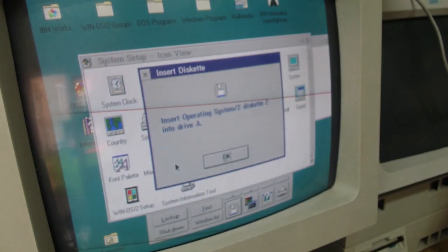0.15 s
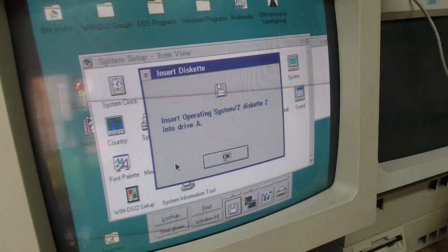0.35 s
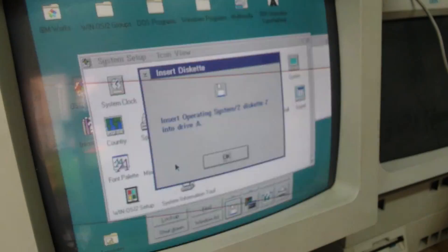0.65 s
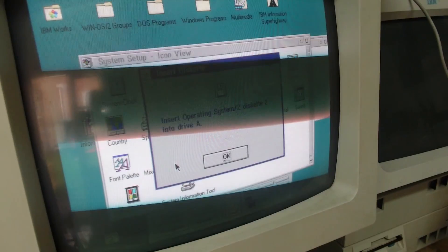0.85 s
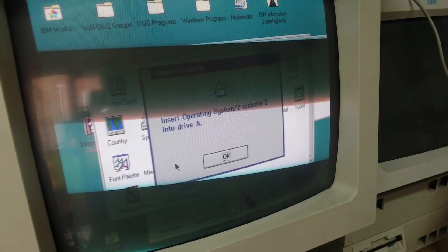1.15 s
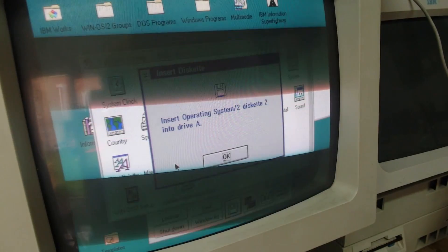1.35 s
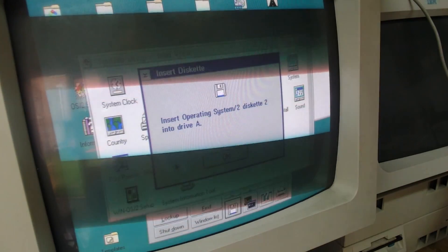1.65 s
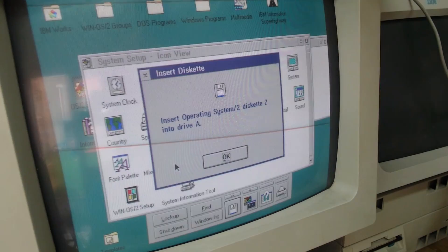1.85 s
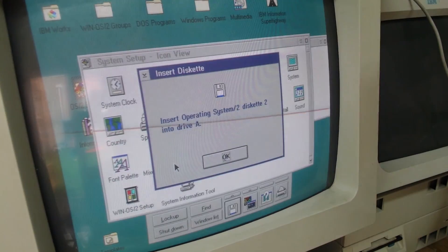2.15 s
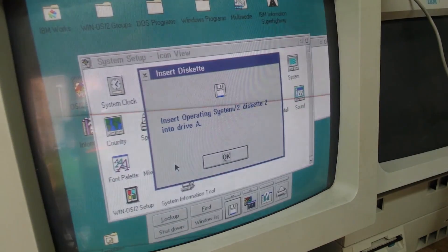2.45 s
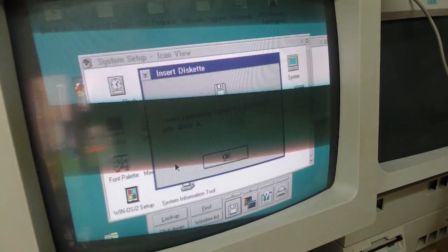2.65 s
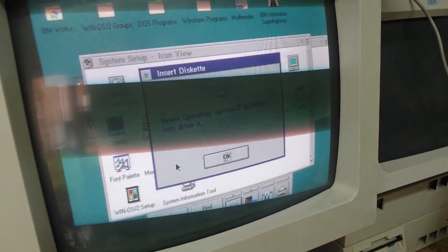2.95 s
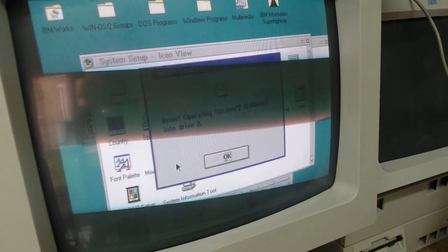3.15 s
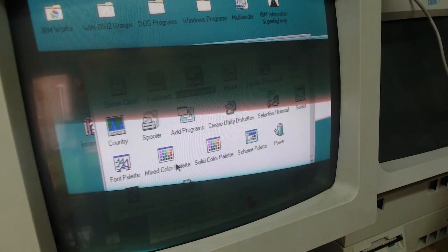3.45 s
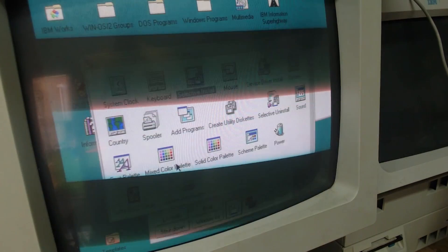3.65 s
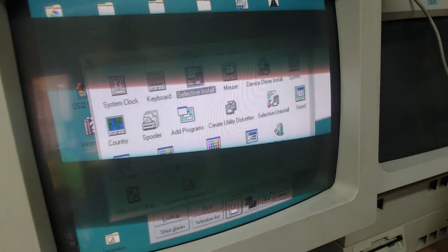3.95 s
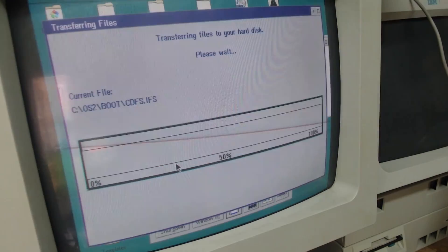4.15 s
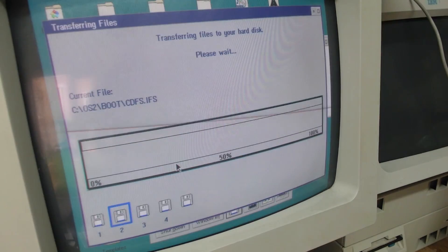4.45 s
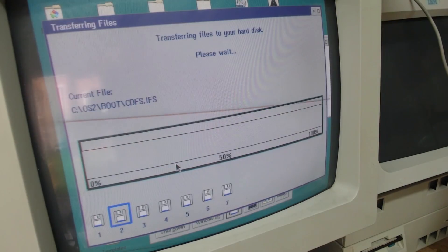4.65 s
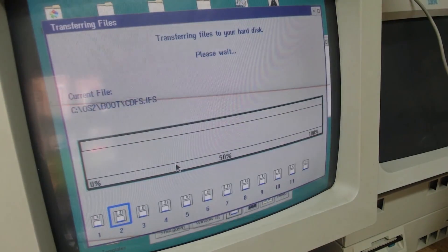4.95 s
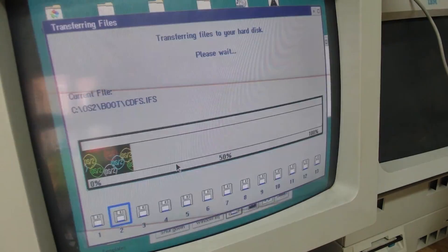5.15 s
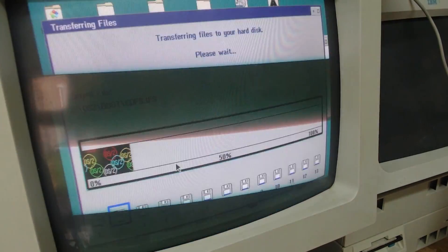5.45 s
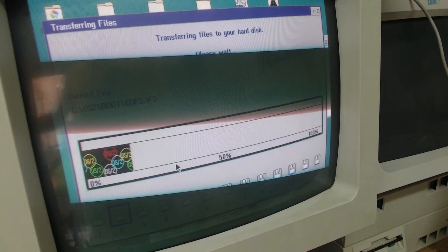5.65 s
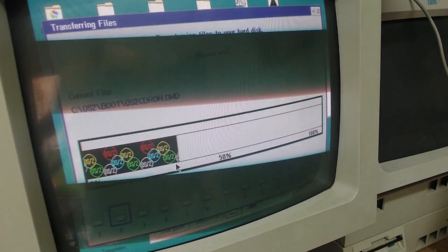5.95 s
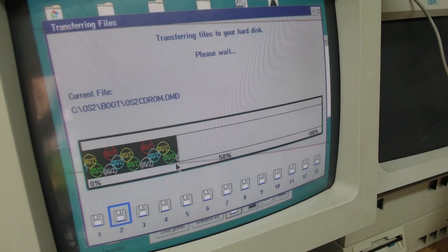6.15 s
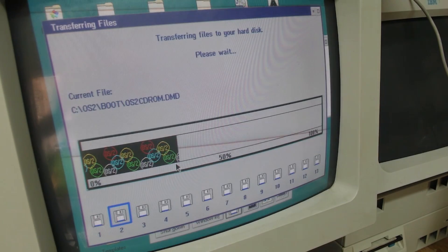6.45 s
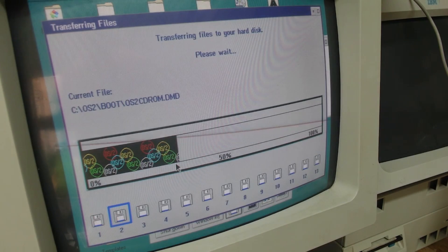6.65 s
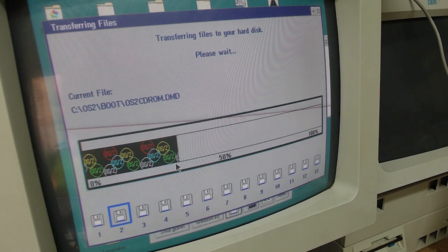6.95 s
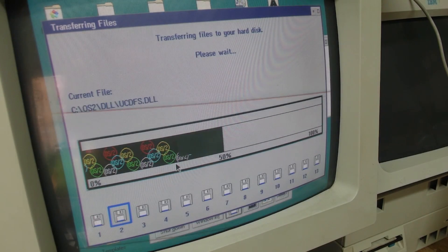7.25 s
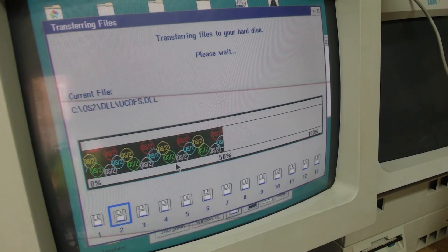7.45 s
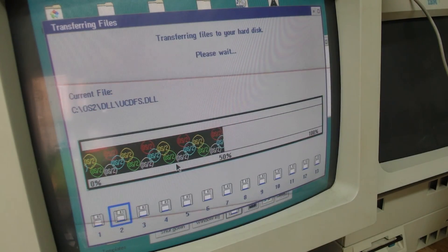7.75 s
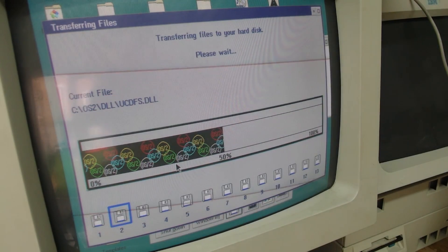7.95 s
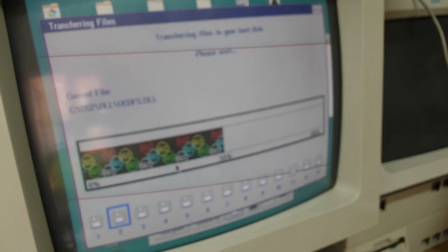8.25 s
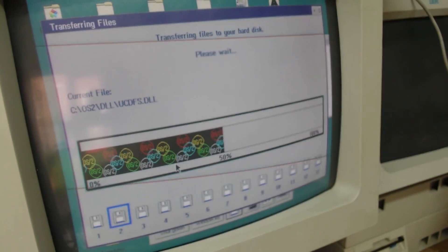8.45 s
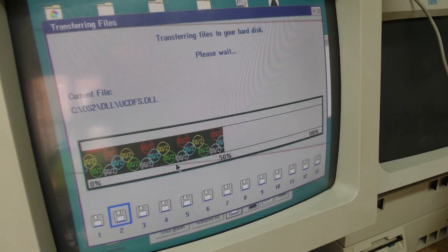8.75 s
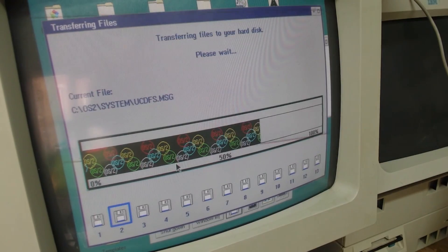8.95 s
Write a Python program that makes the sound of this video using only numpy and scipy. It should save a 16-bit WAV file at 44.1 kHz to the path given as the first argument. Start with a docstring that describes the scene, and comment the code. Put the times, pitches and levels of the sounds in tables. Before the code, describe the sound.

In a small room, a close single microphone hears a hard plastic snap, then light ticks and scrapes as a diskette is handled. A cluster of sharp clacks follows near two seconds as it seats. The drive's thin, high whine swells and beats, short stepper buzzes come around four seconds, then the plastic is shuffled and clicked again over soft fan hiss.

```python
"""A small room with a desktop computer: a plastic diskette is handled, pushed into a drive and shuffled about.
Strokes are gritty noise and knocks are short noise bursts, both ringing plastic modes; sung notes are added.
The spindle motor whines on sines near 3 kHz that swell and beat; the head stepper buzzes on two sines.
Fans hiss as shaped noise over steady hums. One microphone feeds both channels."""
import sys
import numpy as np
from scipy import signal
from scipy.io import wavfile

SR = 44100
rng = np.random.default_rng(int(sys.argv[2]) if len(sys.argv) > 2 else 0)


def to_wav(sig):
    """Store sig (one row per channel, or 1-D mono) as 16-bit WAV at the path in sys.argv[1].

    Samples outside -1..1 are clipped; the rate is SR.
    """
    pcm = np.clip(np.atleast_2d(sig), -1, 1) * 32767
    pcm = np.round(pcm).astype(np.int16)
    wavfile.write(sys.argv[1], SR, pcm.T)  # frames by channels


N = 401751

# air noise of the fans, relative density: hz, level_db (per Hz)
FAN_SPECTRUM = [(25, 13.5), (55, -17), (90, -23), (190, -8.5), (450, -6.5), (700, -10.5), (1250, -10),
                (1500, -20.5), (2100, -16), (2900, -17.5), (4000, -18), (7000, -22), (10000, -28.5),
                (16000, -35)]
FANS_DB = -60   # rms of all bands together
# steady hums and whistles of the computer: pitch_hz, level_db (rms before wavering)
HUMS = [(73, -80.5), (1200, -81), (1245, -74), (1814, -74.5), (9000, -76), (10800, -84), (11700, -86.5)]

# weaker motor tones, mostly on every seventh multiple of the turn rate and its neighbours: multiple
MOTOR_MULTIPLES = (35, 42, 47, 48, 49, 55, 57, 69, 70, 77, 83, 92, 98, 99, 113, 120, 147, 154)
# their levels in the same order: level_db (rms before wavering)
MOTOR_MULTIPLES_DB = (-75, -77, -81, -75, -77, -75.5, -72.5, -70, -71.5, -72.5, -74, -77.5, -74.5, -86, -77,
                      -76.5, -77.5, -78)
TURN_HZ = 46.215
POLES, FAINT_FROM, FAINT_TO = 7, 11, 36   # faint tones flank these multiples of the pole rate, the last excluded
FAINT_DB, FAINT_DB_PER_OCTAVE = -84.5, -6   # lowest faint tone before wavering, slope above it

# strongest motor tones, the first three evenly spaced: pitch_hz
WHINE_HZ = (2866.3, 2911.45, 2956.6, 3281.0, 7072.0)
# their uneven swelling and fading: time_s, then level_db (rms before flutter) of each tone
WHINE_CURVE = [(0, -63, -78, -63, -65, -73), (0.42, -54, -60, -57, -48, -59),
               (0.75, -78, -66, -68, -62, -82), (1.0, -82, -76, -80, -58, -79),
               (1.42, -70, -60, -57.5, -63, -75), (1.7, -78, -62.5, -71, -62, -68),
               (2.05, -64, -65, -71, -58, -61), (2.14, -53.5, -62, -66, -60, -70),
               (2.3, -69, -84, -58, -61, -68), (2.75, -70, -56, -58.5, -60, -75),
               (3.12, -67, -56, -52.5, -62, -78), (3.25, -51, -74, -63, -60, -80),
               (3.5, -57, -77, -56, -52.5, -78), (3.76, -71, -66, -57.5, -63, -63),
               (4.04, -56, -55.5, -52, -61, -74), (4.12, -51, -56, -46.5, -64, -72),
               (4.4, -59, -63, -59.5, -63, -67), (4.68, -87, -68, -57.5, -61, -76),
               (4.9, -58, -57.5, -60, -74, -66), (5.1, -59, -52, -57, -77, -69),
               (5.26, -49, -49.5, -52, -61, -65), (5.42, -58, -65, -58, -69, -75),
               (5.62, -59, -71, -71, -71, -51), (6.12, -43, -51, -62, -53, -66),
               (6.4, -43, -54.5, -51.5, -61, -74), (6.75, -62, -65, -72, -68, -91),
               (7.05, -54, -80, -80, -76, -74), (7.25, -48, -54, -69, -62, -94),
               (7.5, -39, -59, -52, -57, -66), (7.78, -52, -61, -72, -60, -67),
               (8.03, -69, -78, -68, -63, -68), (8.27, -57.5, -78, -69, -69, -63),
               (8.55, -48.5, -68, -55.5, -65, -72.5), (8.82, -44, -54, -56, -60, -59),
               (9.1, -64, -54.5, -70, -67, -88)]
THROB_S = 5.2535   # moment at which the strong tones are nearly in step
# fluttering swells of noise below the whine: centre_s, half_length_s, level_db (at the centre)
SWELLS = [(1.43, 0.15, -58.5), (2.14, 0.038, -53.5)]
SWELL_HZ, SWELL_WIDTH_HZ = 2630, 140

# bursts of the head stepper: start_s, end_s, step_level_db, octave_level_db (rms before unevenness)
SEEKS = [(3.562, 3.594, -72, -50), (3.605, 3.682, -56.5, -56.5), (3.968, 4.008, -76, -55),
         (4.023, 4.085, -54.5, -62), (4.19, 4.282, -59.5, -65), (4.275, 4.322, -74, -58)]
STEP_HZ = 323

# modes of diskette and drive, each table: pitch_hz, width_hz (nominal), level_db (relative)
# hollow body, low and boxy
HOLLOW_MODES = [(103, 84, -22.5), (190, 193, -6), (252.5, 137, 1), (421, 74, -1.5), (609, 138, -5.5)]
# plastic shell, middle
SHELL_MODES = [(759, 174, 1.5), (947, 317, -1.5), (1252, 380, -4), (1525, 203, -0.5), (1736, 270, 0.5),
               (2236, 280, -0.5), (2550, 166, 1.5), (2883, 460, -4), (4214, 810, -8.5)]
# hard edges, bright
EDGE_MODES = [(3920, 810, 0), (4650, 365, 2.5), (5230, 1600, -0.5), (7230, 900, -4.5), (8170, 1380, -4),
              (11270, 3900, -11), (13240, 4700, -14), (14800, 600, -13)]
PATCHY_DB, EDGE_PATCHY_DB = 2.5, 2.2   # spread by which a shifting grip moves each mode

# knocks and snaps: start_s, level_db (relative peak), hollow_db and edge_db (above shell), pitch_hz (struck part)
KNOCKS = [(0.085, -44, -10, -10, 1220), (0.123, -7.5, -34, -3.5, 2497), (0.221, -32, -28, 2.5, 1090),
          (0.263, -20, -3, -13, 2490), (0.349, -25.5, -30, 0, 1760), (0.459, -29.5, -13, -4, 1460),
          (0.56, -28, -25, 5, 1275), (0.647, -32.5, -31, -1, 2274), (0.886, -30.5, -24, -1, 870),
          (0.899, -22, -30, -26, 1216), (1.009, -37, -22, -18, 1010), (1.034, -31.5, -21, -6, 803),
          (1.05, -34.5, -17, 2.5, 1180), (1.09, -19.5, -25, 8.5, 1225), (1.095, -15.5, -28, -2, 1395),
          (1.1, -40.5, 7.5, -25, 113), (1.198, -45.5, -33, 11, 1090), (1.214, -38, -22, -24, 1250),
          (1.816, -11.5, -6.5, 2, 1510), (1.818, -17, 6, -21, 414), (1.871, -9, -21, -2.5, 1360),
          (1.912, -17.5, -25, -1, 1240), (1.921, -21.5, -25, 9, 1510), (3.251, -31.5, -10, -6.5, 858),
          (3.308, -31, -5, 3, 1880), (3.324, -25, -3.5, -12, 1715), (3.412, -31, -21, 7, 970),
          (3.455, -25.5, -33, -3, 2980), (3.466, -24.5, -40, 4, 2480), (3.47, -26, -27, -15.5, 2460),
          (3.515, -38.5, -28, 9.5, 966), (3.546, -29, -30, 3.5, 2660), (3.593, -32, -23, 2, 1720),
          (3.712, -35.5, -33, 7.5, 1570), (3.799, -35.5, -25, 11.5, 1051), (3.883, -23, -37, -6, 2406),
          (3.917, -34.5, -33, 3.5, 1046), (4.18, -38, -8, 10, 1730), (4.219, -37.5, -8, 1, 2900),
          (4.321, -41, -12, 5.5, 1084), (4.467, -29.5, -18, -12, 2490), (4.501, -33.5, -29, -25, 1840),
          (4.506, -34.5, -1.5, -25, 617), (4.543, -37, -22, -25, 934), (4.809, -38, -28, 7.5, 1650),
          (5.047, -49.5, 8.5, -25, 250), (5.167, -33, -28, -15.5, 1290), (5.363, -40, -25, -20, 1830),
          (5.489, -33, -1, -9, 1750), (5.512, -29, -23, 6, 2250), (5.7, -35, -15, 8, 1050),
          (5.706, -14, -10, -10, 2790), (5.727, -13.5, -31, -8.5, 3060), (5.762, -20, -0.5, -6, 934),
          (5.812, -36.5, -15, 14.5, 1550), (5.867, -24.5, -27, -8, 3620), (5.898, -24.5, -9, -4, 737),
          (5.967, -28.5, -21, 15, 2010), (5.985, -21, -21, -11, 947), (6.056, -23, -6, -11, 890),
          (6.262, -33, -18, -22.5, 2046), (6.331, -32.5, 0.5, -19, 1070), (6.525, -34.5, -13, -22, 810),
          (6.896, -37.5, -39, 12.5, 2130), (7.176, -26.5, -7, 3, 729), (7.532, -37.5, -13, -6, 1280),
          (7.696, -36, -7, -4, 1570), (7.846, -42.5, -1, -25, 466), (7.906, -26.5, -42, -11, 1500),
          (8.1, -39, -23, -20, 1490), (8.269, -40, 5.5, -7, 181), (8.753, -44.5, -22, 2, 2010),
          (8.834, -39, -34, -6, 2420)]
CRACK_T60_S = 0.013   # time for the crack to fall 60 dB
SOFT_BELOW_DB = -15   # knocks with less edge than this land softly
LOW_NOTE_HZ = 650   # knocks below this note strike the hollow body
# the stronger the edge above this level, the brighter the snap: dB per octave of tilt for each dB of edge
SNAP_FROM_DB, SNAP_DB_PER_OCTAVE = 6.5, 1.06

# sliding strokes of plastic parts: start_s, rise_s, fade_s, level_db (shell peak, relative),
# loss_db (over the fade, negative grows), hollow_db and edge_db (above shell), pitch_hz (favoured shell)
RUBS = [(0.116, 0.004, 0.17, -32.5, 37, 0.5, -4, 2040), (0.225, 0.033, 0.14, -37, 2, -7.5, -1, 1620),
        (0.409, 0.045, 0.032, -36, 6.5, -16.5, 2, 1460), (0.48, 0.012, 0.067, -52.5, -2, -14, 12, 1840),
        (0.565, 0.018, 0.022, -39, 4.5, -6.5, -9, 1170), (0.646, 0.002, 0.019, -46, 6.5, -22, -12, 2200),
        (0.874, 0.022, 0.035, -39.5, 5.5, -2.5, -10.5, 1110), (1.03, 0.024, .03, -46.5, 9, -10, -12, 1210),
        (1.079, 0.01, 0.17, -32, 32, -5, -2.5, 1370), (1.19, 0.0081, 0.023, -51.5, -1.5, -20, -23, 1105),
        (1.811, 0.0025, 0.087, -34, -0.5, 3, -10, 1450), (1.925, 0.0091, 0.046, -33, 13.5, -17, -20, 1560),
        (2.36, 0.062, 0.04, -57, 23, 1.5, -18, 1570), (2.8, 0.083, 0.15, -30, 18, -33, -2.5, 2650),
        (3.183, 0.0069, .035, -47.5, 3, -22, -18, 4263), (3.235, 0.013, 0.32, -48, -5, -17, -13, 1164),
        (3.705, 0.0043, 0.13, -50.5, 3.5, -10, -10, 1190), (3.87, 0.027, 0.15, -50, 0, -17, 2, 1020),
        (4.1, 0.047, 0.057, -44.5, 5, -9, -14, 900), (4.25, 0.016, 0.13, -56, 3, -4.5, -7, 1220),
        (4.466, 0.0046, 0.046, -42, 8, -32, -19, 1880), (4.52, 0.0088, 0.05, -51, 12, -25, -17, 1500),
        (4.585, 0.013, 0.062, -56.5, -5, -9, -13, 1710), (4.72, 0.025, 0.094, -56.5, 0, -19, -11, 1200),
        (4.93, 0.02, 0.037, -60.5, 2, -9, -15, 1205), (5.05, 0.032, 0.098, -51.5, 10, -13, -9, 1200),
        (5.355, 0.0077, 0.13, -58, 10, -9, -18, 1750), (5.315, 0.01, 0.035, -58, 1, -10, -20, 1205),
        (5.482, 0.024, 0.17, -37, 9, -7.5, -2.5, 1470), (5.695, 0.038, 0.077, -30.5, 6, -6, -2, 1500),
        (5.778, 0.01, 0.39, -36.5, 1, -7, 0, 1004), (6.02, 0.057, 0.074, -30.5, 8.5, -6.5, -2.5, 1240),
        (6.17, 0.0083, 0.049, -38.5, 13, -24, -1, 1315), (6.257, 0.013, 0.19, -40, 24.5, -15.5, -0.5, 1502),
        (6.53, 0.011, 0.096, -57, 8, -20, -13, 950), (6.72, 0.035, 0.087, -51.5, 12, -17, -6, 1150),
        (6.893, 0.013, 0.053, -36.5, 10, -33, 2.5, 2110), (6.94, 0.052, 0.12, -39.5, 11, -22, -18, 1230),
        (7.075, 0.023, 0.027, -57, 6.5, -20, 14, 2190), (7.144, 0.014, 0.047, -41.5, -1, -20, -4, 1150),
        (7.28, 0.031, 0.081, -44.5, 22, -39, -22, 1670), (7.6, 0.013, 0.075, -52, 3, -11, -8, 1010),
        (7.67, 0.032, 0.055, -40.5, 13, -33, -2.5, 1580), (7.72, 0.04, 0.039, -46.5, -0.5, -18, -13, 4400),
        (7.894, 0.016, 0.096, -32.5, 33, -28, 5, 2020), (7.96, 0.0083, 0.25, -54, 10, -28, -1, 4570),
        (8.1, 0.012, 0.044, -48.5, 2.5, -12, -8, 880), (8.19, 0.042, 0.052, -62, -1, -25, -5, 4600)]
RUB_START_DB, RUB_LIFT_S, RUB_LIFT_DB = -13, 0.028, -8   # starts below its peak, lifts off quickly
SLOW_START_DB_PER_S = 80   # a slow rise starts softer still
LIGHT_FROM_DB, LIGHT_SPAN_DB = -37, 11   # strokes below this level grow light over this span
EDGE_SWING = 0.3   # the edge rises and falls by this share more than the lowest shell mode
CHATTER_PER_S, CHATTER_S, CHATTER_DB = 70, 0.0021, 0   # loose parts tick: rate, decay time, largest tick
SPOT_DB, LIGHT_SPOT_DB = -18, 13.5   # song of the rubbed spot relative to stroke level, extra when light
SPOT_SHARPNESS = 8.0   # Hz of pitch per Hz of width

CUTOFF_HZ = 16400   # upper limit of the sound; nothing is heard above it


def from_db(db):
    """Decibels to gain."""
    return 10 ** (np.asarray(db) / 20)


def rms_one(x):
    """Scale to unit rms."""
    return x / np.sqrt(np.mean(x ** 2) + 1e-20)


def in_time(rows):
    """Draw the columns of a breakpoint curve, sample by sample."""
    s, *columns = np.transpose(rows)
    return np.array([np.interp(np.arange(N) / SR, s, c) for c in columns])


def drift(rate_hz):
    """Slow random wander of spread 1: noise through two equal poles, at one point per 40 samples."""
    r = np.exp(-2 * np.pi * rate_hz * 40 / SR)
    noise = rng.standard_normal(N // 40 + 2002)
    slow = signal.lfilter([1], [1, -2 * r, r * r], noise)[2000:]   # skip the settling
    return np.interp(np.arange(N) / 40, np.arange(len(slow)), rms_one(slow))


def resonance(x, hz, width_hz):
    """Two-pole resonance, gain 1 on top."""
    r = np.exp(-np.pi * width_hz / SR)
    feedback = [1, -2 * r * np.cos(2 * np.pi * hz / SR), r * r]
    return signal.lfilter((1 - r * r) / 2 * np.array([1, 0, -1]), feedback, x)


def steep_resonance(x, hz, width_hz):
    """The same resonance twice in a row, for steeper flanks."""
    return resonance(resonance(x, hz, width_hz), hz, width_hz)


def fans():
    """Steady air noise, built from half-octave bands of white noise."""
    out, white = np.zeros(N), rng.standard_normal((2, N))
    edges = 24 * 2 ** np.arange(0, 9.9, .5)
    hz, db = np.transpose(FAN_SPECTRUM)
    for k, (low, high) in enumerate(zip(edges, edges[1:])):
        band_filter = signal.butter(2, [low, high], "band", fs=SR, output="sos")
        band = signal.sosfilt(band_filter, white[k % 2])   # neighbours use separate noise
        out += from_db(np.interp(np.log(low * high) / 2, np.log(hz), db)) * band
    return from_db(FANS_DB) * rms_one(out)


def weak_tones(tones, waver_db, flutter_db=1.0):
    """Sines of fixed pitch whose levels waver slowly and flutter faster."""
    t, out = np.arange(N) / SR, np.zeros(N)
    for hz, db in tones:
        gain = from_db(db + waver_db * drift(1.0) + flutter_db * drift(25))
        out += np.sqrt(2) * gain * np.sin(2 * np.pi * (hz * t + rng.random()))
    return out


def computer_hums():
    """Hums and whistles of the computer: sines of steady pitch."""
    return weak_tones(HUMS, waver_db=5.0)


def faint_tones(waver_db=5.5):
    """A comb of faint motor sines through the treble, one turn rate either side of each pole multiple."""
    t, out = np.arange(N) / SR, np.zeros(N)
    wavers = [from_db(waver_db * drift(1.7)) for _ in range(POLES)]   # shared in rotation
    flanks = []
    for k in range(FAINT_FROM, FAINT_TO):
        for multiple in (POLES * k - 1, POLES * k + 1):
            near_top_whine = abs(multiple * TURN_HZ - WHINE_HZ[-1]) <= TURN_HZ / 2
            if multiple not in MOTOR_MULTIPLES and not near_top_whine:
                flanks.append(multiple)
    for k, multiple in enumerate(flanks):
        db = FAINT_DB + FAINT_DB_PER_OCTAVE * np.log2(multiple / flanks[0])
        tone = np.sin(2 * np.pi * (multiple * TURN_HZ * t + rng.random()))
        out += np.sqrt(2) * from_db(db) * wavers[k % POLES] * tone
    return out


def motor(flutter_db=1.0, skirt_db=-18.0, high_skirt_db=-2.5):
    """Spindle whine: strong sines swell and flutter with a noisy skirt, weak multiples of the turn rate waver."""
    t, levels = np.arange(N) / SR, from_db(in_time(WHINE_CURVE))
    out, together = np.zeros(N), from_db(1.0 * drift(16))
    for hz, gain in zip(WHINE_HZ, levels):
        phase = 2 * np.pi * hz * (t - THROB_S) + 0.22 * drift(3.1)   # nearly in step, so even spacing throbs
        out += np.sqrt(2) * gain * together * from_db(flutter_db * drift(25)) * np.cos(phase)
    multiples = [(k * TURN_HZ, db) for k, db in zip(MOTOR_MULTIPLES, MOTOR_MULTIPLES_DB)]
    out += weak_tones(multiples, waver_db=2.5, flutter_db=flutter_db)
    skirt = rms_one(steep_resonance(rng.standard_normal(N), 2880, 220))
    high_skirt = rms_one(steep_resonance(rng.standard_normal(N), 7250, 1700))
    out += from_db(skirt_db) * levels[:-1].sum(axis=0) * skirt
    return out + from_db(high_skirt_db) * levels[-1] * high_skirt


def swells(flutter_db=3.5):
    """Narrow noise below the whine, chopped once a turn."""
    t = np.arange(N) / SR
    gate = sum(from_db(db) * np.clip(1 - ((t - s) / half) ** 2, 0, 1) for s, half, db in SWELLS)
    throb = (1 + np.cos(2 * np.pi * TURN_HZ * t)) ** 2 * from_db(flutter_db * drift(18.8))
    return gate * rms_one(steep_resonance(throb * rng.standard_normal(N), SWELL_HZ, SWELL_WIDTH_HZ))


def stepper(edge_s=0.0072):
    """Head stepper: gated bursts of two sines, the step rate and its octave."""
    t, out = np.arange(N) / SR, np.zeros(N)
    uneven = from_db(3.0 * drift(37))   # the carriage binds and frees
    step, octave = np.sin(2 * np.pi * STEP_HZ * t), np.sin(4 * np.pi * STEP_HZ * t)
    for start, end, step_db, octave_db in SEEKS:
        gate = np.sqrt(2) * np.clip(np.minimum(t - start, end - t) / edge_s, 0, 1) * uneven
        out += gate * (from_db(step_db) * step + from_db(octave_db) * octave)
    return out


def favour(modes, hz, focus_db):
    """Modes far from the spot of contact are driven less, by focus_db per octave: gain for each mode."""
    return from_db(3.0 - focus_db * np.abs(np.log2(np.array(modes)[:, :1] / hz)))


def knock_notes(note_db=-6.0, t60_s=0.05, cycles=17.0, ratio=1.3):
    """The struck part adds its own note: two sines, the weaker one 1.3 times higher, build in a cycle and die."""
    out, t = np.zeros(N), np.arange(SR // 4) / SR
    for s, peak_db, hollow_db, edge_db, hz in KNOCKS:
        i = round(s * SR)
        level_db = peak_db + note_db + (hollow_db if hz < LOW_NOTE_HZ else 0)
        two_sines = np.sin(2 * np.pi * hz * t) + .5 * np.sin(2 * np.pi * ratio * hz * t)
        decay = from_db(level_db - 60 * t / (t60_s + cycles / hz))   # low notes ring longer
        out[i:i + len(t)] += (decay * np.minimum(hz * t, 1) * two_sines)[:N - i]
    return out


def knock_levels(tail_t60_s=0.13, tail_db=-9.5, edge_tail_t60_s=0.16, edge_tail_db=-7.5,
                 focus_db=4.0, soft_focus_db=13.0):
    """Each knock is a short crack and a weaker rattle that dies: gains of hollow, shell and edge modes."""
    out, t = np.zeros((len(HOLLOW_MODES + SHELL_MODES + EDGE_MODES), N)), np.arange(SR // 3) / SR
    crack = from_db(-60 * t / CRACK_T60_S)
    shape = crack + from_db(tail_db - 60 * t / tail_t60_s)
    edge_shape = crack + from_db(edge_tail_db - 60 * t / edge_tail_t60_s)
    octaves = np.log2(np.array(EDGE_MODES)[:, :1] / 7100.0)
    for s, peak_db, hollow_db, edge_db, hz in KNOCKS:
        i = round(s * SR)
        tilt_db = SNAP_DB_PER_OCTAVE * max(edge_db - SNAP_FROM_DB, 0) * np.minimum(octaves, 0.6)
        hollow = from_db(hollow_db) * favour(HOLLOW_MODES, hz, soft_focus_db * (hz < LOW_NOTE_HZ))
        # a soft knock stays near its note
        shell = favour(SHELL_MODES, hz, focus_db if edge_db > SOFT_BELOW_DB else soft_focus_db)
        gains = np.vstack([hollow * shape, shell * shape, from_db(edge_db + tilt_db) * edge_shape])
        out[:, i:i + len(t)] += from_db(peak_db - 8.0) * gains[:, :N - i]
    return out


def strokes():
    """Every stroke rises, fades and lifts off: samples, shape in dB, lightness 0-1, then its level and colour."""
    for s, rise, fade, peak_db, loss_db, *colour in RUBS:
        corners = np.cumsum([s, rise, fade, RUB_LIFT_S])
        on = np.arange(round(corners[0] * SR), round(corners[-1] * SR))
        start_db = RUB_START_DB - SLOW_START_DB_PER_S * rise
        shape_db = np.interp(on / SR, corners, [start_db, 0, -loss_db, RUB_LIFT_DB - loss_db])
        light = np.clip((LIGHT_FROM_DB - peak_db) / LIGHT_SPAN_DB, 0, 1)
        yield on, shape_db, light, peak_db, *colour


def rubbed_spots():
    """Each stroke sings in one narrow resonance of the spot that it rubs, driven by uneven noise."""
    friction = rng.standard_normal(N) * from_db(4 * drift(12))   # it catches and slips
    out = np.zeros(N)
    for on, shape_db, light, peak_db, hollow_db, edge_db, hz in strokes():
        sung = rms_one(steep_resonance(friction[on], hz, hz / SPOT_SHARPNESS))
        out[on] += from_db(peak_db + shape_db + SPOT_DB + LIGHT_SPOT_DB * light) * sung
    return out


def rub_levels(focus_db=3.5, light_focus_db=6.0):
    """Gains of hollow body, edge and each shell mode; a light stroke favours the modes near its spot more."""
    out = np.zeros((2 + len(SHELL_MODES), N))
    octaves = np.log2(np.array(SHELL_MODES)[:, :1] / SHELL_MODES[0][0])
    height = np.vstack([1, octaves / octaves[-1]])   # edge, then shell: higher modes swing more
    for on, shape_db, light, peak_db, hollow_db, edge_db, hz in strokes():
        shell = favour(SHELL_MODES, hz, focus_db + light_focus_db * light)
        gains = np.vstack([from_db([[hollow_db], [edge_db]]), shell])
        levels = gains * from_db(peak_db + shape_db)
        levels[1:] *= from_db(EDGE_SWING * height * shape_db)
        out[:, on] = np.hypot(out[:, on], levels)
    return out


def chatter():
    """Loose parts tick while they slide: a gain that jumps at random moments and falls back at once."""
    ticks = from_db(CHATTER_DB) * rng.random(N) * (rng.random(N) < CHATTER_PER_S / SR)
    return rms_one(1 + signal.lfilter([1], [1, -np.exp(-1 / (CHATTER_S * SR))], ticks))


def grit(per_s, spread_db):
    """Dense tiny slips of uneven size and random sign, unit rms."""
    sizes = from_db(spread_db * np.minimum(rng.exponential(1, N), 4)) * rng.choice([-1, 1], N)
    return rms_one(sizes * (rng.random(N) < per_s / SR)) + 1e-9


def diskette(firm_db=-27.5, brighten=0.09, first_touch=3.84):
    """Slips and knocks drive the plastic modes; as the grip shifts, each mode is damped more or less."""
    rubbed, knocked = rub_levels() * chatter(), knock_levels()
    n_hollow, n_edge = len(HOLLOW_MODES), len(EDGE_MODES)
    hollow = np.hypot(rubbed[0], knocked[:n_hollow])
    shell = np.hypot(rubbed[2:], knocked[n_hollow:-n_edge])
    edge = np.hypot(rubbed[1], knocked[-n_edge:])
    slips = grit(per_s=6000, spread_db=0.5)
    # a sharp knock opens with one hard contact
    slips[[round(row[0] * SR) for row in KNOCKS if row[3] > SOFT_BELOW_DB]] = first_touch
    # a light touch is duller
    firmness = np.clip(edge / from_db(firm_db), .03, 3)
    edge = edge * firmness ** (brighten * np.log2(np.array(EDGE_MODES)[:, :1] / EDGE_MODES[0][0]))
    out = np.zeros(N)
    for forces, modes, patchy_db in ((hollow, HOLLOW_MODES, PATCHY_DB), (shell, SHELL_MODES, PATCHY_DB),
                                     (edge, EDGE_MODES, EDGE_PATCHY_DB)):
        # nominal power the group passes from unit noise; 1.296 trims the level
        power = sum(from_db(2 * db) * width * np.pi / SR for hz, width, db in modes)
        for k, (force, (hz, width, db)) in enumerate(zip(forces, modes)):
            ring = steep_resonance(force * slips, hz, 1.45 * width)
            grip = from_db(db + patchy_db * drift(10.6))
            out += (-1) ** k * grip * ring / np.sqrt(power / 1.296)   # neighbours alternate in sign
    return out


def scene():
    """All sources at one microphone, the same in both channels."""
    computer = fans() + computer_hums()
    drive = faint_tones() + motor() + swells() + stepper()
    handling = knock_notes() + rubbed_spots() + diskette()
    return np.tile(computer + drive + handling, (2, 1))


def record(dry):
    """The capsule drops the deep bass, peaks are rounded, the top is cut steeply."""
    thin = signal.sosfilt(signal.butter(1, 120, "high", fs=SR, output="sos"), dry)
    rounded = .6 * np.tanh(thin / .6)
    return signal.sosfilt(signal.cheby2(22, 70, CUTOFF_HZ, fs=SR, output="sos"), rounded)


dry = scene()
out = record(dry)
to_wav(out)
```